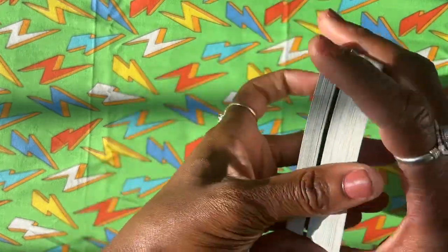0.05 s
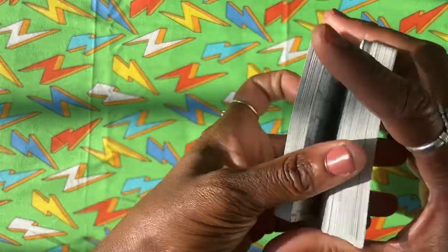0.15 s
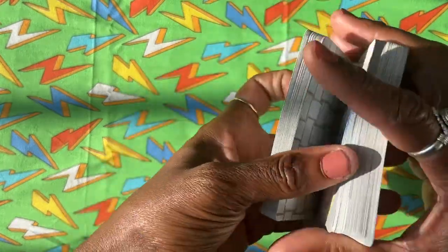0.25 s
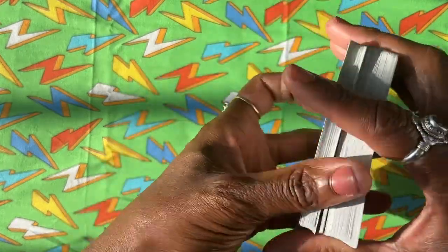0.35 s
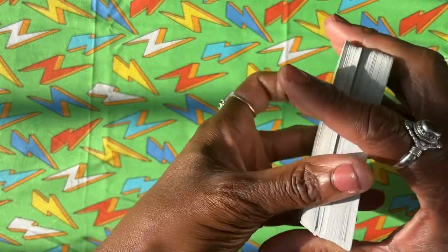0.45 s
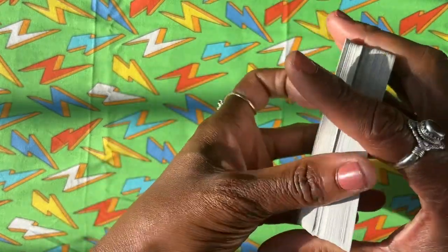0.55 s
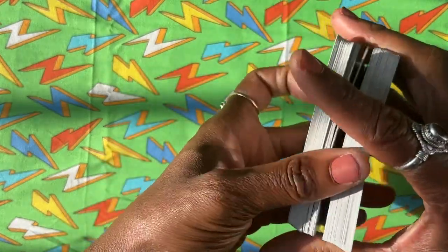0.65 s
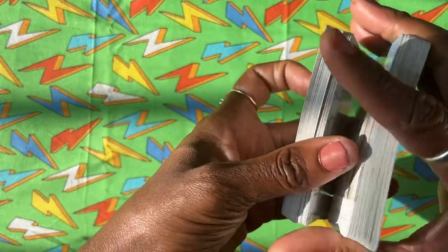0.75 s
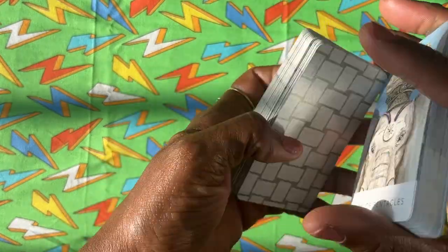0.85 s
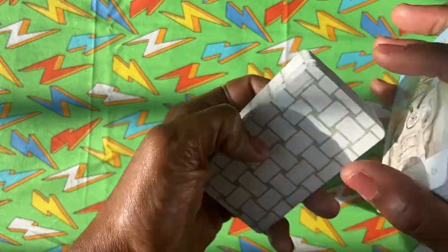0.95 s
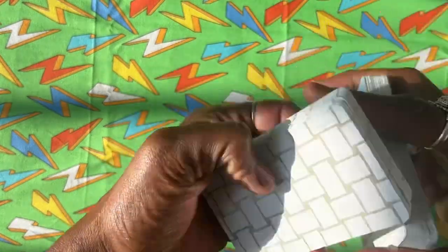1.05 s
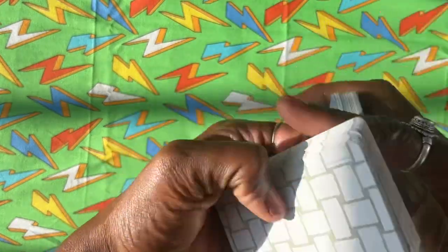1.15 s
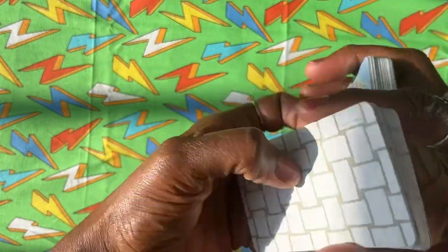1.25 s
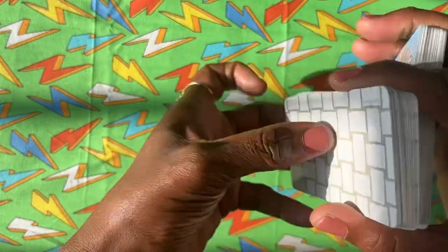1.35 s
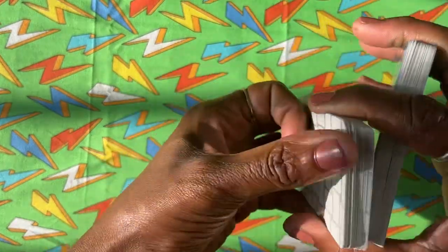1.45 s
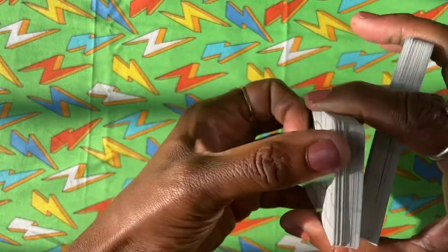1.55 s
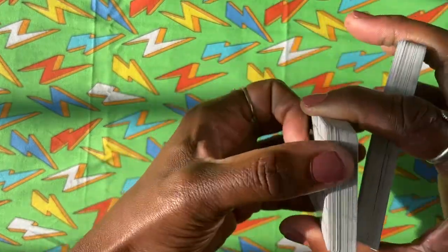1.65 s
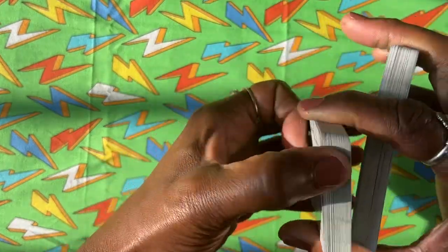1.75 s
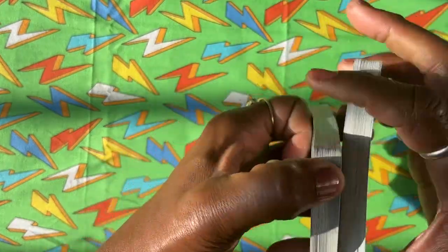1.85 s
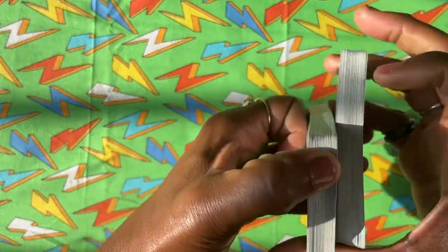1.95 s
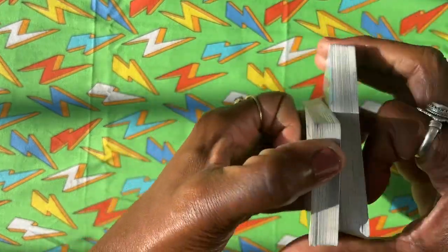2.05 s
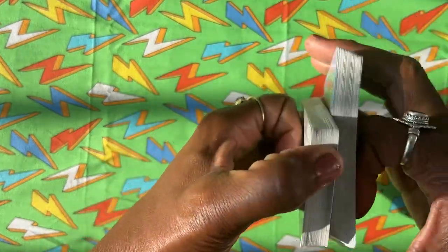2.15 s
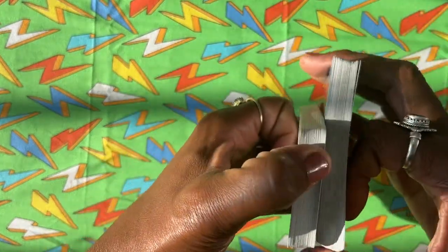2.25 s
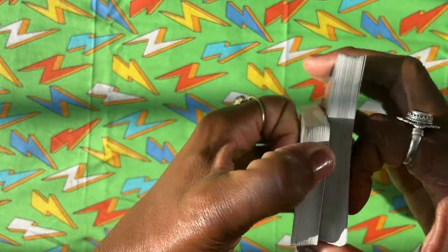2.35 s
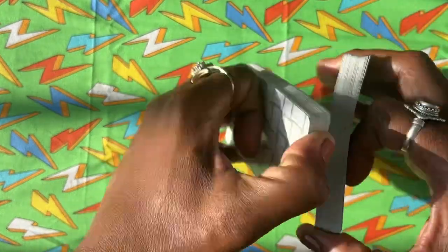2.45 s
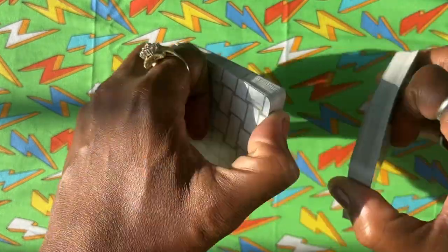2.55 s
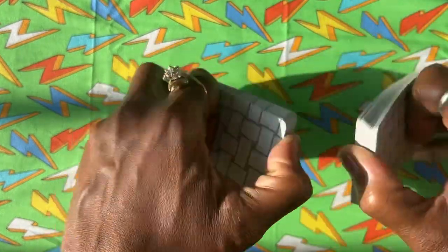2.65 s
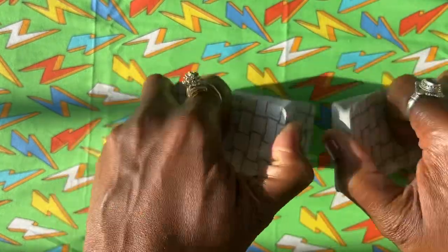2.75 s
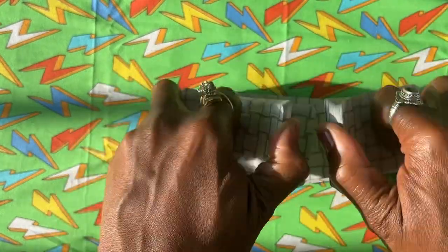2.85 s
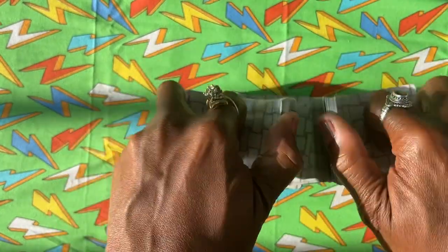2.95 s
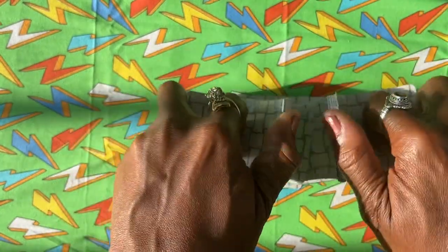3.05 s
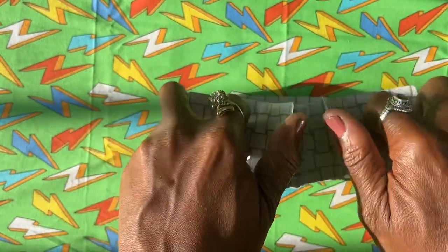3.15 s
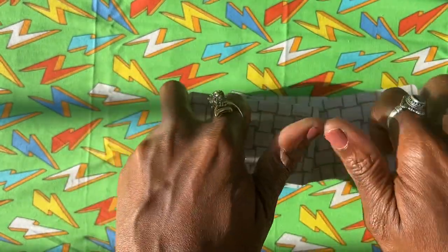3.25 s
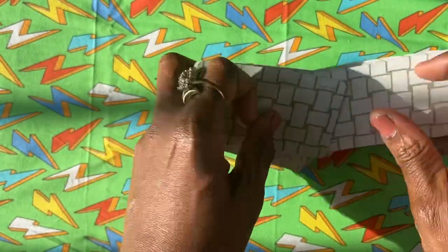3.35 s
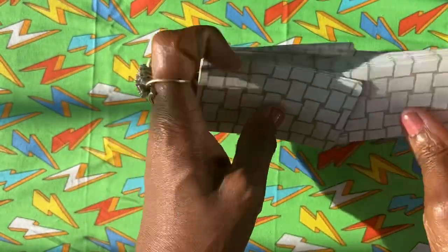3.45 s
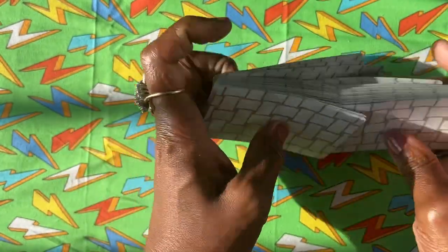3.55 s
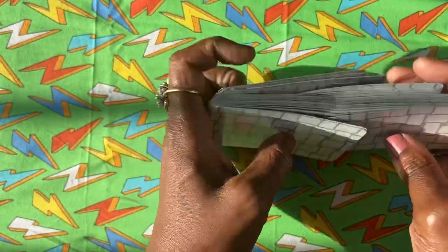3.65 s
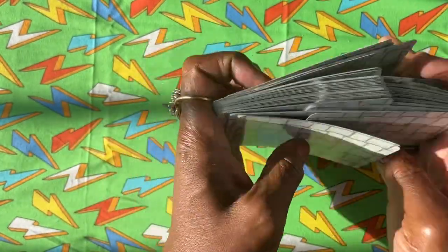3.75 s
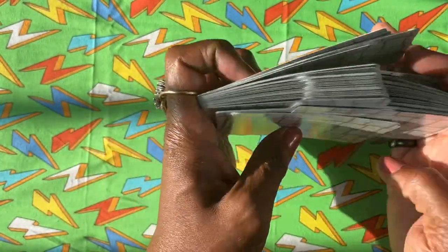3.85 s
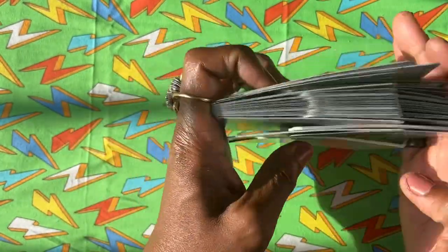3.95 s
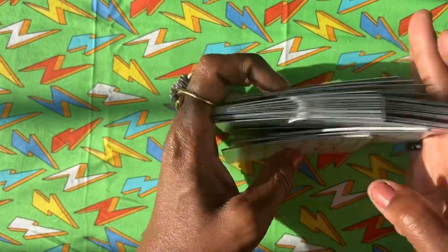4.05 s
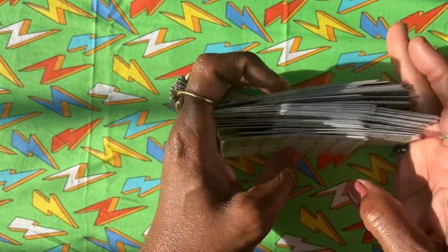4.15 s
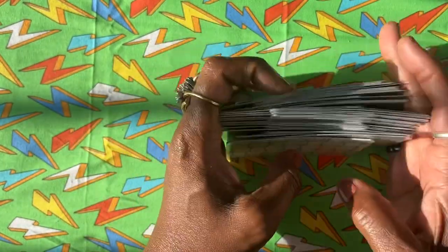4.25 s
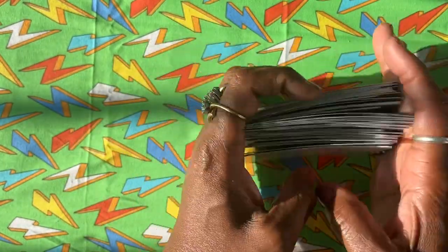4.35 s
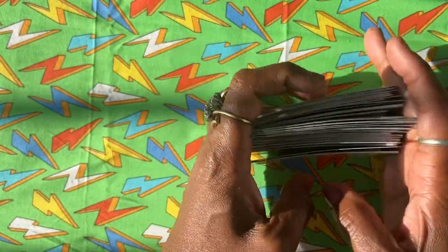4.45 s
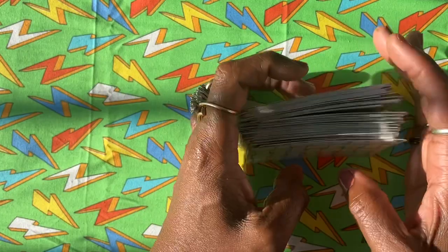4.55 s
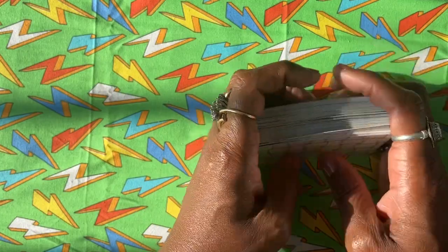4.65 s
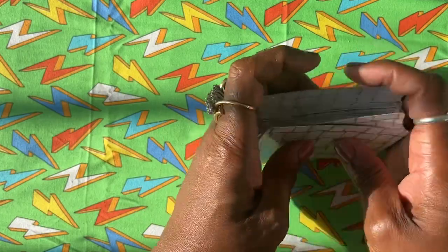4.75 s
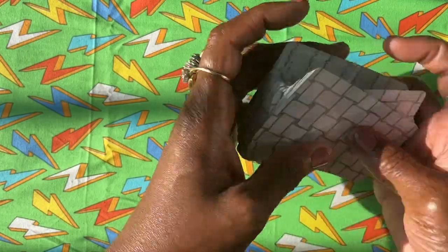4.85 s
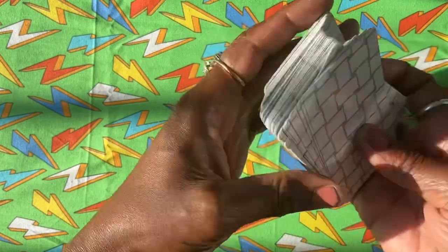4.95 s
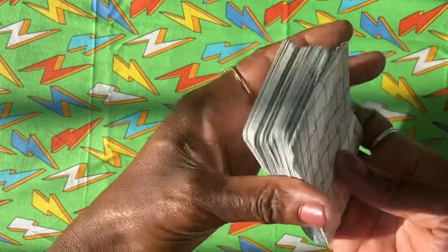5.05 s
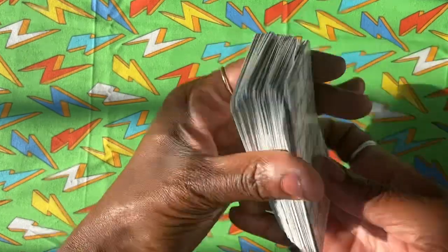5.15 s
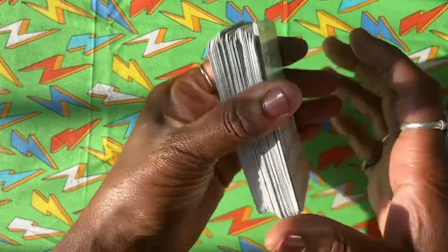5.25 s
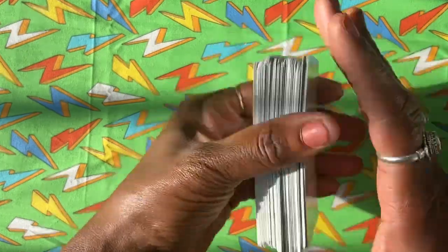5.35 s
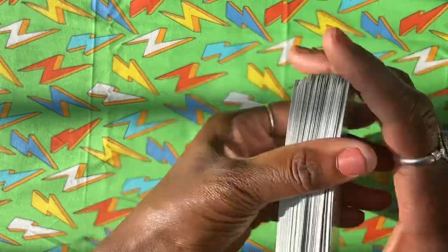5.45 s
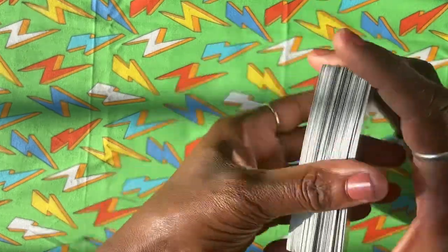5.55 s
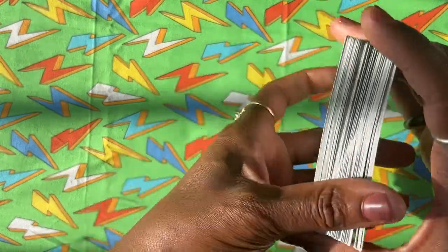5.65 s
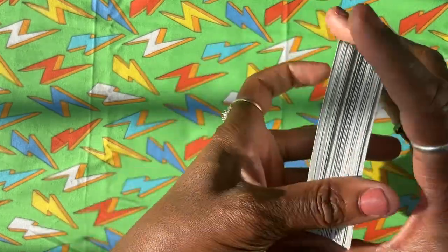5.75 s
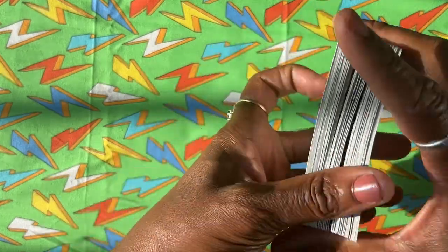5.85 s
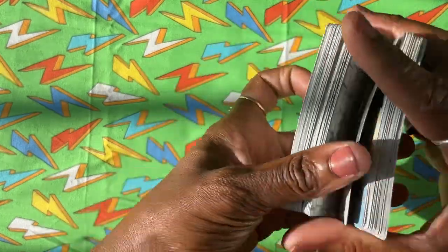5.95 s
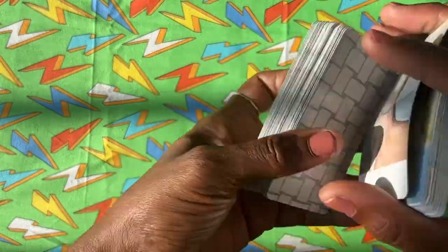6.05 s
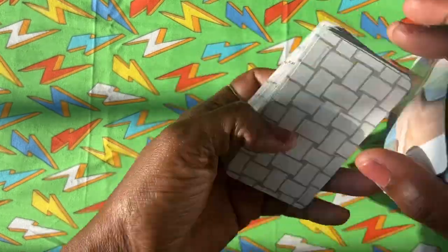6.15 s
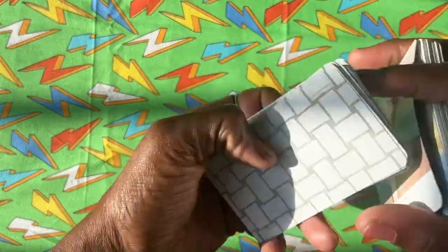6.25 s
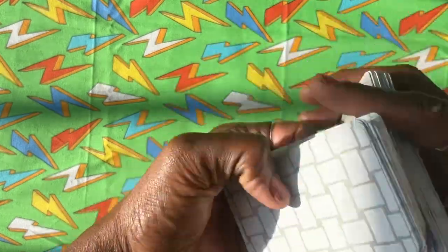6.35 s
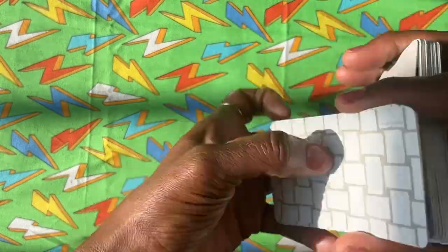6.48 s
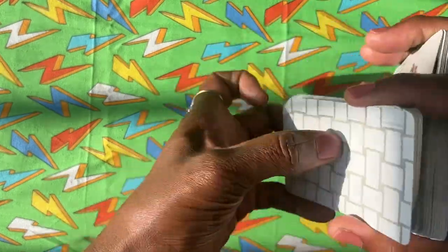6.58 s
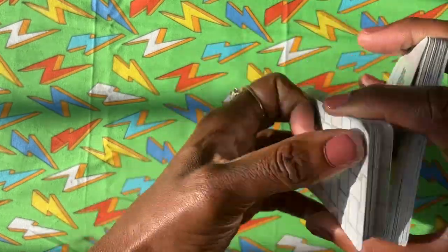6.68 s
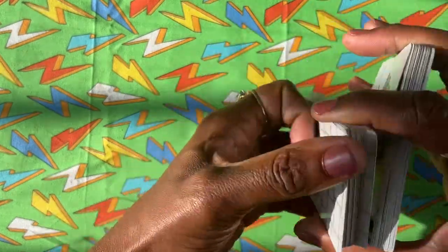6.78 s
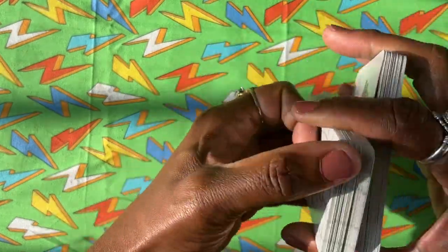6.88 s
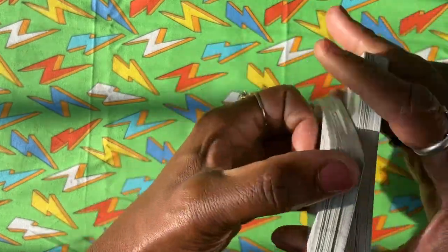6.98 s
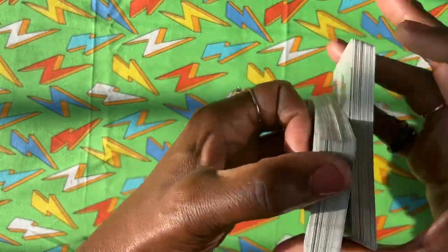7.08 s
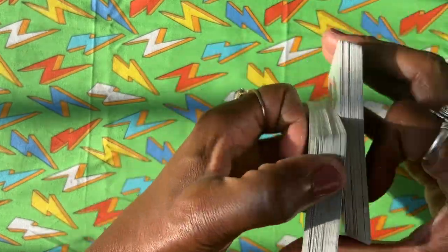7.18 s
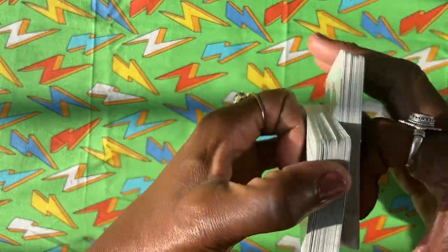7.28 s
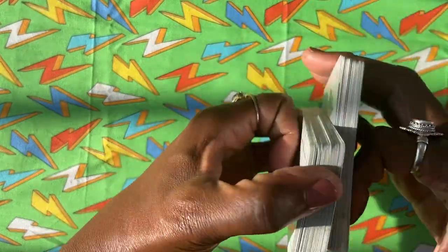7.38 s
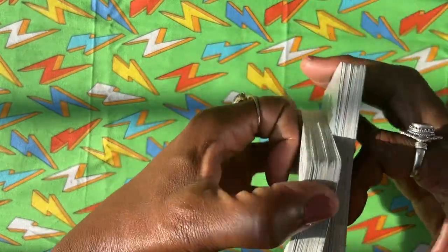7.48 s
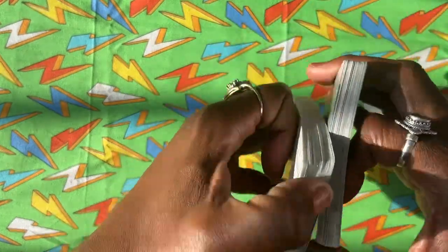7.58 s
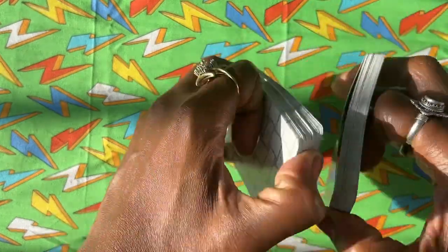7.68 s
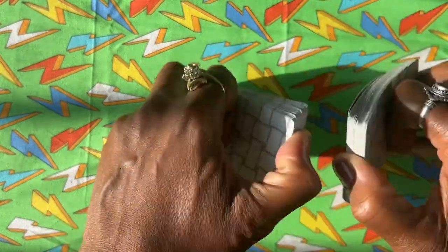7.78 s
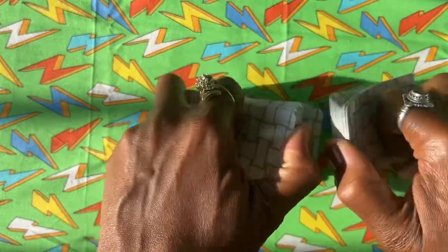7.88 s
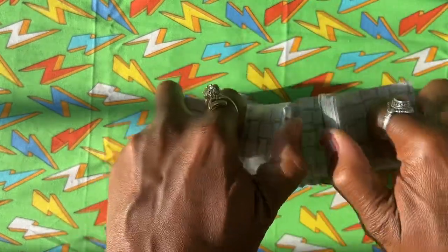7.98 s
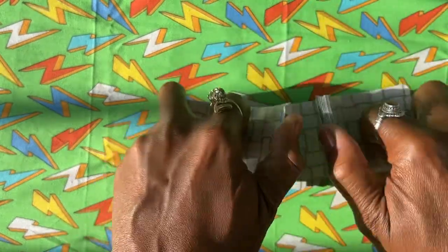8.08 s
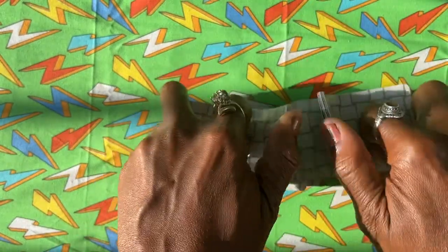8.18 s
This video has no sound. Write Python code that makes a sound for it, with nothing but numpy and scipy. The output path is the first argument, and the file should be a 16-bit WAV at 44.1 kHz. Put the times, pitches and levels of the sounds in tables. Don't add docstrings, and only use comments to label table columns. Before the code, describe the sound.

Quiet card-edge rubbing and ticking, then a loud crackling riffle, soft hollow knocks pushing the deck together, more handling, and a second riffle cut off.

```python
import sys
import numpy as np
from scipy import signal
from scipy.fft import rfft, irfft, next_fast_len
from scipy.io import wavfile
from scipy.ndimage import uniform_filter1d, map_coordinates

SR = 44100
rng = np.random.default_rng(int(sys.argv[2]) if len(sys.argv) > 2 else 0)


def file_out(sig):
    cols = np.atleast_2d(sig).T
    lim = np.clip(cols, -1, 1)
    pcm = np.round(lim * 32767).astype(np.int16)
    wavfile.write(sys.argv[1], SR, pcm)


def magnitude_from_level(level_db):
    exponent = np.asarray(level_db, float) / 20
    return 10 ** exponent


N = 362502
TIME_S = np.arange(N) / SR
FRAME = 4096
LAG_S = (np.arange(FRAME) - FRAME // 2) / SR

# [freq_hz, level_db]
CARD_COLOUR = [(500, -16.5), (1200, 2), (2500, 3), (4000, 2), (6500, -2.5), (8200, -3), (12500, -10.5),
               (15400, -7.5), (17000, -49.5)]


def unit(x):
    return x / np.sqrt(np.mean(x ** 2) + 1e-20)


def along(points, hz):
    f, v = np.transpose(points)
    return np.interp(np.log(hz + 1), np.log(f + 1), v)


def wobble(knots_per_s):
    knots = rng.standard_normal(int(N * knots_per_s / SR) + 4)
    return map_coordinates(knots, [TIME_S * knots_per_s])


def filtered(x, response):
    n = x.shape[-1]
    m = next_fast_len(n + 4096)
    return irfft(rfft(x, m) * response(np.fft.rfftfreq(m, 1 / SR)), m)[..., :n]


def resonance(f, hz, width_hz):
    return 1j * f * width_hz / (hz * hz - f * f + 1j * f * width_hz)


def deck_body(f):
    # [freq_hz, width_hz, level_db]
    air_modes = [(191, 19, -9), (337, 120, -0.5), (528, 150, -3), (725, 143, -0.5), (1060, 400, -10.5),
                 (1450, 290, -8.5)]
    response = 0
    for k, (hz, width_hz, db) in enumerate(air_modes):
        response = response + (-1) ** k * magnitude_from_level(db) * resonance(f, hz, width_hz)
    return response


def spread(pair, alike):
    turn = lambda hz: np.arccos(np.clip(along(alike, hz), -1, 1)) / 2
    mid, side = filtered(pair, lambda hz: np.array([np.cos(turn(hz)), np.sin(turn(hz))]))
    return np.array([mid + side, mid - side])


def add(out, start_s, peak_db, burst):
    peak = np.sqrt(np.abs(uniform_filter1d(burst[0] ** 2, size=66)).max())
    target = out[:, round(start_s * SR):][:, :FRAME]
    target += magnitude_from_level(peak_db) * burst[:, :target.shape[1]] / peak


def blank():
    return np.zeros((2, N + FRAME))


def trimmed(out):
    return out[:, FRAME // 2:][:, :N]


def swell(fall_ms, rise):
    return np.exp(np.where(LAG_S < 0, LAG_S / rise, -LAG_S) * 1000 / fall_ms)


def gestures(rows, attack_db_per_s, release_db_per_s, rest_db):
    out_db = np.full(N, float(rest_db))
    for start_s, hold_s, db in rows:
        before_db = attack_db_per_s * (start_s - TIME_S)
        after_db = release_db_per_s * (TIME_S - start_s - hold_s)
        out_db = np.maximum(out_db, db - np.maximum(before_db, np.maximum(after_db, 0)))
    return out_db


def snaps(rows, shorten, rise, ring_db, ring_width, spiky_db, body_db, upper, lead_in):
    out = blank()
    for start_s, peak_db, hz, ms, deck_db in rows:
        noise = rng.standard_normal((5, FRAME))
        upper_hz = hz * rng.uniform(1.4, 2.6)
        shape = swell(shorten * ms, rise + 0.0012 * ms)
        release = 2.2 * min(1, 10 / ms) * swell(.3, .3)
        drag = lead_in * swell(0.96, 3.2)
        spikes = magnitude_from_level(spiky_db * unit(uniform_filter1d(noise[4], size=12)))
        crackle = noise[:2] * ((shape + drag) * spikes + release)
        tilt = np.clip(.4 - 0.044 * ms + 1.2 * np.log2(hz / 3000), -1.2, 1.3)

        def card(f):
            lower_mode = resonance(f, hz, ring_width * hz)
            upper_mode = upper * resonance(f, upper_hz, ring_width * hz)
            ring = 1 + magnitude_from_level(ring_db) * (lower_mode - upper_mode)
            return magnitude_from_level(along(CARD_COLOUR, f)) * (1 + f / 5000) ** tilt * ring

        add(out, start_s, peak_db, filtered(crackle, card))
        pumped = filtered(noise[2:4] * shape, deck_body)
        add(out, start_s + .001, peak_db + deck_db + body_db, pumped)
    return trimmed(out)


def blows(rows, shorten, rise, sharp, rattle):
    out = blank()
    for start_s, peak_db, hz, ms in rows:
        noise = rng.standard_normal((4, FRAME))
        drift = filtered(noise[:2], lambda f: resonance(f, hz, hz / sharp) ** 2)
        tone = np.sin(2 * np.pi * (hz * LAG_S + rng.random((2, 1)))) + 0.55 * unit(drift)
        tone = tone + rattle * unit(filtered(noise[2:], deck_body))
        rounded = uniform_filter1d(swell(shorten * ms, rise), size=int(SR / hz))
        add(out, start_s, peak_db, tone * rounded * np.hanning(FRAME))
    return trimmed(out)


def room_tone():
    # [freq_hz, density_db_per_hz]
    spectrum = [(28, -6), (50, 1.5), (111, -3), (220, -15.5), (288, -31), (720, -30), (950, -38.5),
                (1300, -27), (1700, -23), (1860, -38), (2500, -38), (3300, -54.5), (9600, -59),
                (16000, -76)]
    # [freq_hz, likeness]
    alike = [(100, .97), (290, .7), (1400, .02), (3000, .5), (12000, .99)]
    # [time_s, level_db]
    drift = [(0, -49.5), (1.3, -51.5), (3.5, -51), (5.6, -52.5), (6.3, -51), (8.22, -52.5)]
    tone = unit(filtered(rng.standard_normal((2, N)), lambda f: magnitude_from_level(along(spectrum, f))))
    return magnitude_from_level(np.interp(TIME_S, *np.transpose(drift))) * spread(tone, alike)


def sliding(clumped):
    # [start_s, hold_s, level_db]
    strokes = [(.1, 0.15, -69.5), (.33, 0.044, -61.5), (.61, 0.079, -69.5), (.84, 0.094, -66),
               (1.1, 0.23, -65.5), (1.42, 0.05, -68.5), (1.62, 0.02, -73.5), (1.76, 0.071, -71.5),
               (2.03, 0.0091, -65), (2.13, 0.023, -69), (2.42, 0.075, -79), (3.66, 0.064, -50.5),
               (4.06, 0.11, -56), (4.31, 0.033, -53.5), (4.52, 0.02, -60), (4.66, 0.053, -59.5),
               (5.0, .29, -66), (5.42, 0.205, -66.5), (5.93, 0.0071, -47.5), (6.09, 0.042, -50),
               (6.28, 0.087, -63), (6.45, 0.073, -58), (6.69, 0.029, -66), (6.82, 0.016, -57.5),
               (6.93, 0.006, -61.5), (7.19, 0.014, -63), (7.56, 0.017, -61), (7.72, 0.115, -69)]
    # [start_s, hold_s, level_db]
    grips = [
        (3.278, 1.46, -66),
        (4.756, 0.17, -72.5),
        (5.9, 1.38, -71.5),
    ]
    # [start_s, hold_s, level_db]
    squeezes = [
        (.05, 1.35, -61.5),
        (3.3, 0.71, -61),
        (4.07, 0.068, -44.5),
        (4.34, 0.0033, -52),
        (4.51, 0.018, -51.5),
        (4.6, 0.1, -45),
        (6.11, 0.0092, -56.5),
        (6.3, 0.2, -57),
        (7.55, 0.011, -57.5),
        (7.75, 0.15, -52),
    ]
    # [time_s, sliding_db]
    thumbs = [
        [(2.55, -88), (2.75, -66), (2.94, -52), (2.98, -31), (3.03, -29.5), (3.08, -22.5), (3.185, -37.5),
         (3.21, -51), (3.4, -83)],
        [(7.8, -97.5), (7.9, -62), (7.98, -50.5), (8.05, -37.5), (8.11, -34.5), (8.17, -32), (8.22, -28.5)],
    ]
    # [sliding_db, air_db]
    flex_law = [(-100, -90), (-68.5, -52), (-58, -39.5), (-30, -23.5)]
    # [freq_hz, level_db]
    light_colour = [(500, -27), (1500, -4), (3300, -2), (6500, -4), (8200, -1.5), (11200, -5.5),
                    (15700, -5), (16400, -42)]

    bends_db = [np.interp(TIME_S, *np.transpose(bend), left=-99) for bend in thumbs]
    thumbs_db = np.maximum(*bends_db)
    rubs_db = gestures(strokes + grips, attack_db_per_s=422, release_db_per_s=376, rest_db=-106)
    hiss_db = np.maximum(thumbs_db, rubs_db)
    flex_db = np.interp(thumbs_db, *np.transpose(flex_law))
    squeezed_db = gestures(squeezes, attack_db_per_s=230, release_db_per_s=169, rest_db=-71.5)
    air_db = np.maximum(flex_db, squeezed_db)
    pressure = np.clip((hiss_db + 46) / 10, 0, 1)

    grain = magnitude_from_level(1.2 * wobble(70) + (2.2 + 3.4 * pressure) * wobble(350))
    z = signal.stft(grain * rng.standard_normal((2, N)), nperseg=256)[2]
    patches = uniform_filter1d(rng.standard_normal(z.shape[1:]), size=5, axis=0)
    patches = uniform_filter1d(patches, size=9, axis=1)
    patchy = signal.istft(z * magnitude_from_level(2.8 * unit(patches)), nperseg=256)[1][:, :N]
    patchy = patchy / magnitude_from_level(2 * pressure)

    light = unit(filtered(patchy, lambda f: magnitude_from_level(along(light_colour, f))))
    firm = unit(filtered(patchy, lambda f: magnitude_from_level(along(CARD_COLOUR, f))))
    firm = unit(filtered(firm, lambda f: (1 + (f / 4000) ** 2) ** -0.2))
    hiss = (1 - pressure) * light + pressure * clumped ** .6 * firm
    rush = unit(filtered(magnitude_from_level(1.1 * wobble(37)) * rng.standard_normal((2, N)), deck_body))
    return magnitude_from_level(hiss_db) * hiss + magnitude_from_level(air_db - 9.5) * clumped ** .55 * rush


def edge_scuffs():
    # [start_s, peak_db, ring_hz, length_ms]
    flicks = [(0.158, -53.5, 2550, 26), (0.6445, -49, 1550, 15.5), (1.124, -51.5, 1670, 67),
              (1.2365, -43.5, 1440, 29), (1.2794, -52.5, 1570, 25), (2.015, -50, 1360, 29),
              (2.1148, -53, 1750, 14), (3.3682, -50, 3600, 2.5), (3.413, -43.5, 1310, 26),
              (3.5418, -54, 2310, 9.2), (3.9398, -44.5, 6420, 14.5), (5.1873, -59.5, 1120, 7.4),
              (5.4909, -53, 1633, 27), (5.9346, -47.5, 3520, 20), (6.262, -44.5, 2680, 6.4),
              (6.2724, -40, 2460, 37), (6.393, -47.5, 1730, 18), (6.4596, -43, 1500, 30),
              (6.5201, -45.5, 1690, 29), (6.5347, -54.5, 1715, 17), (7.129, -47.5, 3240, 10.8),
              (7.18, -49, 1624, 19)]
    # [start_s, peak_db, ring_hz, length_ms]
    more_flicks = [(.34, -56, 3260, 15), (.885, -61, 2600, 10), (.93, -61, 2380, 11), (1.073, -69, 2600, 11),
                   (1.093, -60, 2600, 11), (1.121, -54, 3200, 11), (1.139, -56, 1820, 14),
                   (1.257, -56, 1480, 7.7), (1.271, -49.5, 2120, 32), (1.319, -59, 2020, 14),
                   (1.321, -66, 4000, 12), (3.41, -49, 2780, 40), (3.547, -53, 1900, 8),
                   (3.649, -50.5, 2200, 5), (3.696, -48, 3460, 89), (3.804, -50.5, 3500, 16),
                   (4.999, -70, 3250, 30), (5.037, -61, 3580, 58), (5.068, -54.5, 3530, 20),
                   (5.134, -58.5, 1246, 14), (5.172, -56.5, 990, 28), (5.182, -56, 1400, 20),
                   (5.195, -55, 1520, 10), (5.238, -59.5, 3330, 18), (5.27, -62.5, 5180, 11),
                   (5.454, -62, 3440, 18.4), (5.503, -54, 2370, 21), (6.057, -54.5, 3100, 14),
                   (6.237, -57.5, 3310, 6), (6.286, -43, 3300, 10), (6.337, -52.5, 1690, 11),
                   (6.478, -54, 4500, 31), (6.546, -55.5, 4390, 6.5), (6.943, -65, 2930, 10),
                   (7.006, -53.5, 1300, 14), (7.166, -60, 1500, 8), (7.197, -54, 1860, 14),
                   (7.216, -60, 1700, 10), (7.236, -57, 1850, 9.7), (7.734, -62, 2960, 9.1),
                   (7.849, -63, 3120, 8.5), (7.872, -66, 4140, 8.9), (7.896, -57.5, 3770, 9.7),
                   (7.913, -52.5, 3060, 9.8)]
    deck_db = -19.5
    return snaps([(*row, deck_db) for row in flicks + more_flicks], shorten=0.33, rise=.33, ring_db=15.0,
                 ring_width=0.072, spiky_db=3.5, body_db=-1.0, upper=0.5, lead_in=0)


def face_taps():
    # [start_s, peak_db, ring_hz, length_ms]
    contacts = [(0.173, -56.5, 2440, 150), (0.3077, -53.5, 1450, 80), (0.3646, -52.5, 1370, 39),
                (0.859, -52.5, 2380, 35), (1.212, -54, 1430, 10), (2.1336, -57, 1610, 190),
                (3.431, -35.5, 3250, 5.9), (3.797, -43.5, 5170, 8.5), (3.8149, -41.5, 790, 12),
                (3.9242, -49.5, 5570, 5.7), (4.069, -49, 1400, 41), (4.3446, -43.5, 1610, 23),
                (4.012, -55, 1950, 4.2), (4.121, -56, 1860, 5.2), (4.606, -42.5, 1584, 10.4),
                (4.628, -53, 1600, 8), (4.6661, -49.5, 1450, 134), (5.0055, -52.5, 1065, 36),
                (5.08, -48.5, 2283, 14.6), (6.069, -50, 8100, 3.2), (6.114, -41.5, 4660, 36),
                (6.4346, -43, 1990, 7.3), (6.9105, -51.5, 2090, 25), (7.25, -53.5, 2090, 36),
                (7.5549, -41, 2226, 20.4), (7.553, -39.5, 8800, 5.3)]
    deck_db = -4
    return snaps([(*row, deck_db) for row in contacts], shorten=0.3, rise=.25, ring_db=8.5,
                 ring_width=0.2, spiky_db=5.5, body_db=-1, upper=0.25, lead_in=0)


def riffle_snaps():
    # [start_s, peak_db, ring_hz, length_ms]
    first_riffle = [(2.7498, -50, 2235, 5.6), (2.7805, -43.5, 1320, 23), (2.795, -40.5, 6240, 6.5),
                    (2.822, -30, 7150, 4.1), (2.8384, -27.5, 1659, 16), (2.8632, -30, 1358, 18),
                    (2.864, -25.5, 7390, 4.5), (2.8913, -18, 4400, 3.8), (2.8918, -15.5, 2927, 4.6),
                    (2.9118, -30, 2754, 8.7), (2.9299, -27, 1700, 4), (2.9584, -14, 3803, 5.7),
                    (2.9628, -14, 2782, 2.8), (2.9772, -14, 7490, 1.2), (2.987, -21.5, 3980, 3.3),
                    (2.9925, -23.5, 2922, 7), (3.0005, -18, 4270, 3.9), (3.0128, -29.5, 3864, 4.1),
                    (3.026, -18.5, 1450, 3), (3.029, -18.5, 6804, 4.6), (3.0416, -17.5, 4380, 4.3),
                    (3.0634, -14.5, 2797, 2.8), (3.0702, -13, 4040, 8.4), (3.0762, -18.5, 3660, 2.9),
                    (3.0843, -21, 3860, 2.9), (3.091, -16.5, 2638, 4), (3.096, -23.5, 7960, 3),
                    (3.104, -23.5, 7500, 6.1), (3.1104, -19, 2620, 4.3), (3.1204, -14.5, 4330, 8.7),
                    (3.1241, -20.5, 7820, 5), (3.138, -24, 2188, 4), (3.1465, -11.5, 2215, 2.5),
                    (3.1527, -18.5, 9230, 2.2), (3.153, -15.5, 2708, 8.3), (3.1664, -27.5, 1288, 13),
                    (3.1755, -29.5, 8040, 4), (3.1784, -20, 2300, 5), (3.1828, -16.5, 2800, 5.6),
                    (3.1864, -12, 4700, 4.5)]
    # [start_s, peak_db, ring_hz, length_ms]
    second_riffle = [(7.9437, -39, 4200, 2.6), (7.945, -37.5, 1400, 5), (7.9635, -32.5, 8000, 4.3),
                     (7.9633, -21, 1820, 8.9), (7.9799, -45, 1390, 6), (7.988, -20.5, 2950, 7.7),
                     (7.997, -37.5, 7000, 3), (8.012, -34, 2960, 20), (8.024, -26.5, 5150, 8.1),
                     (8.0291, -22.5, 2510, 5.2), (8.0335, -15.5, 2890, 6.2), (8.045, -38, 1600, 7),
                     (8.0547, -25, 3800, 10), (8.0608, -22.5, 1770, 3), (8.0665, -18, 7800, 2.9),
                     (8.0669, -16, 1330, 7.3), (8.079, -22, 7740, 2.3), (8.0797, -21, 1290, 11),
                     (8.0995, -23, 1490, 8), (8.1155, -21.5, 2830, 6.4), (8.1299, -20.5, 3350, 6.4),
                     (8.138, -19, 4130, 2), (8.1533, -17.5, 7940, 4.2), (8.155, -11, 3110, 4.5),
                     (8.163, -19.5, 4064, 3), (8.1723, -11, 3860, 7.6), (8.184, -25, 2040, 11),
                     (8.194, -14, 4102, 10), (8.213, -34, 4138, 5), (8.2192, -14.5, 2680, 6.5)]
    full_pump_db, pump_lag_db_per_db = -31.5, 0.49
    flips = []
    for row in first_riffle + second_riffle:
        flips.append((*row, -pump_lag_db_per_db * max(row[1] - full_pump_db, 0)))
    return snaps(flips, shorten=0.61, rise=0.14, ring_db=8.5, ring_width=.1, spiky_db=3.5,
                 body_db=-5.5, upper=.6, lead_in=.1)


def clumps(riffle):
    force = np.abs(riffle[0])
    near = np.abs(uniform_filter1d(force, size=SR // 150)) + 1e-4
    around = np.abs(uniform_filter1d(force, size=SR // 12)) + 1e-4
    return near / around


def palm_knocks():
    # [start_s, peak_db, pitch_hz, length_ms]
    pushes = [(2.775, -38, 242, 20), (3.4349, -48.5, 230, 6.6), (3.8163, -40.5, 395, 22),
              (4.0155, -34, 349, 14.4), (4.06, -33, 300, 18), (4.0877, -29, 323, 15),
              (4.1212, -37, 640, 29), (4.1586, -34.5, 337, 31), (4.1946, -40, 381, 29),
              (4.4644, -46.5, 330, 16), (4.518, -40.5, 388, 24), (4.53, -33, 256, 19),
              (4.543, -30.5, 352, 110), (4.608, -45, 447, 6.9), (4.6936, -53.5, 319, 94),
              (5.19, -51, 996, 16.2), (6.1242, -48, 475, 25), (6.2806, -50.5, 516, 29),
              (6.438, -52.5, 365, 13.4), (7.5573, -45.5, 667, 20), (7.8732, -59, 510.0, 35)]
    return blows(pushes, shorten=0.38, rise=0.36, sharp=2.0, rattle=0.13)


def air_pops():
    # [start_s, peak_db, pitch_hz, length_ms]
    first_pops = [(2.7831, -38.5, 349.8, 14.6), (2.8229, -34.5, 590.0, 4.5), (2.8397, -34.7, 712, 9.7),
                  (2.8649, -31.5, 530, 17.9), (2.8951, -33, 366.4, 14), (2.9128, -26.5, 645, 11),
                  (2.9311, -28.5, 753, 12), (2.95, -32, 680.0, 2.6), (2.964, -22, 687, 6.9),
                  (2.9957, -19.5, 696, 11), (3.0034, -34, 480.3, 2.4), (3.015, -34.5, 447, 2.7),
                  (3.0272, -21.5, 764, 9.1), (3.0475, -20.5, 463.4, 6.8), (3.067, -18.5, 694, 11),
                  (3.0829, -24, 505, 2.2), (3.092, -17.5, 646, 4.1), (3.1024, -21, 661.3, 5.1),
                  (3.112, -16.5, 671.4, 10.6), (3.1263, -25.5, 516, 7.7), (3.1484, -20.5, 489, 6.1),
                  (3.1588, -24, 690.0, 12), (3.168, -22.5, 452.7, 8.4), (3.1809, -29, 650.0, 3.3),
                  (3.1888, -23.5, 700, 9.2)]
    # [start_s, peak_db, pitch_hz, length_ms]
    second_pops = [(7.9347, -38, 330.0, 18.1), (7.9641, -28, 880, 7.1), (7.9795, -32.5, 472.3, 5.7),
                   (7.99, -31.5, 940, 9.4), (7.998, -30, 490.0, 8.8), (8.0124, -28.5, 725, 5.2),
                   (8.0334, -28, 825, 7), (8.045, -28.5, 467, 12), (8.0576, -23, 494, 4.5),
                   (8.0684, -23, 650.0, 51.6), (8.083, -30.5, 750, 8.9), (8.1013, -28, 560.0, 8),
                   (8.1087, -25.5, 620.0, 2.9), (8.1175, -22.5, 608, 5.6), (8.133, -18, 539, 1.4),
                   (8.139, -23, 360.5, 15.5), (8.1566, -27.5, 650.0, 2.5), (8.1644, -22.5, 535, 30.4),
                   (8.1721, -21, 718, 5.7), (8.187, -27, 744, 5.8), (8.1969, -21, 720, 8.3)]
    longest_ms = 12
    rows = [(*row[:3], min(row[3], longest_ms)) for row in first_pops + second_pops]
    return blows(rows, shorten=0.37, rise=0.7, sharp=1.2, rattle=0.41)


def table_thuds():
    # [start_s, peak_db, pitch_hz, length_ms]
    thuds = [(2.8093, -36, 114, 55), (2.859, -34, 91, 33), (2.88, -32, 45.3, 64), (2.9161, -33.5, 115, 24),
             (2.941, -34.5, 122, 20), (2.9723, -32.5, 96, 21), (3.005, -39, 101, 42),
             (3.0358, -31.5, 94, 45), (3.097, -33.5, 156, 35), (3.1, -28.5, 45.6, 120),
             (3.1326, -26, 81.4, 30), (3.201, -19, 99, 31), (3.2373, -39.5, 129, 13),
             (3.2602, -35, 115, 17), (4.0274, -40.5, 93.2, 23), (4.0753, -34, 115.5, 15),
             (4.108, -27.5, 129, 47.8), (4.1755, -30, 108, 49), (4.5434, -36.5, 137.3, 83),
             (4.5731, -37.5, 118.6, 26), (6.5297, -39, 103, 68.6), (7.9365, -35.5, 127.3, 14),
             (7.9892, -34.5, 112, 40), (8.0117, -34, 108, 14), (8.0799, -29, 95.6, 43),
             (8.1221, -29.5, 103, 48.3), (8.1905, -29.5, 122, 34), (8.2, -28, 44.6, 90)]
    return blows(thuds, shorten=0.73, rise=0.95, sharp=1.5, rattle=0.013)


def thumbnail_ticks():
    # [start_s, peak_db]
    clicks = [
        (2.9775, -17),
        (3.001, -19.5),
        (3.0286, -18),
        (3.041, -19.5),
        (3.1528, -13),
        (8.1278, -31),
    ]
    out = blank()
    for start_s, peak_db in clicks:
        burst = rng.standard_normal((2, FRAME)) * swell(.45, .7)
        add(out, start_s, peak_db, filtered(burst, lambda f: resonance(f, 14000, 6500) ** 2))
    return trimmed(out)


def walls(x):
    # [freq_hz, t60_s]
    decay = [(200, 0.16), (2000, 0.6), (5000, 0.21), (11000, 0.21)]
    hz, t, z = signal.stft(rng.standard_normal((3, 2, SR // 3)), SR, nperseg=256)
    tails = signal.istft(z * magnitude_from_level(-60 * t / along(decay, hz)[:, None]), SR, nperseg=256)[1]
    x = np.pad(x, ((0, 0), (300, 0)))
    turn = np.arange(x.shape[1]) / SR * 20
    echo = 0
    for k, tail in enumerate(tails):
        spot = (1 + np.cos(2 * np.pi * (turn + k / 3))) / 3
        echo = echo + signal.fftconvolve(x * spot, tail / np.linalg.norm(tail[0]), axes=1)[:, :N]
    return echo * np.sqrt(2)


def scene():
    # [freq_hz, likeness]
    card_alike = [(100, .98), (140, .8), (240, .97), (600, .92), (1400, .7), (3100, .94), (6500, .85),
                  (12000, .99)]
    # [freq_hz, left_over_right_db]
    deck_side = [(60, 0), (330, -.5), (600, -5.5), (1400, 1.5), (3000, 1.05)]
    riffle = riffle_snaps()
    near = riffle + air_pops() + edge_scuffs() + face_taps()
    near = near + palm_knocks() + table_thuds() + thumbnail_ticks()
    scattered = [(hz, alike - 0.12 * (hz > 5000)) for hz, alike in card_alike]
    hands = spread(near + magnitude_from_level(-21) * walls(near), scattered)
    hands = hands + spread(sliding(clumps(riffle)), card_alike)
    sided = filtered(hands, lambda hz: magnitude_from_level(np.outer([.5, -.5], along(deck_side, hz))))
    return sided + room_tone()


def roll_off(x):
    return signal.sosfilt(signal.butter(12, 17000, fs=SR, output="sos"), x)


def record(dry):
    # [freq_hz, lead_rad]
    port_lead = [(0, 0), (5200, -.3), (6200, -2.1), (7000, -4.3), (8300, -6.1), (10200, -6.9),
                 (12100, -9.1), (13600, -9.8), (15200, -12.3), (16500, -12.6)]
    f, lead_rad = np.transpose(port_lead)
    capsule = filtered(dry, lambda hz: 1 / (1 + (34 / (hz + 1)) ** 4))
    phase = lambda hz: np.exp(.5j * np.outer([1, -1], np.interp(hz, f, lead_rad)))
    ports = filtered(capsule, phase) * magnitude_from_level([[-.3], [.3]])
    bent = ports / (1 + np.abs(ports / .85) ** 4) ** (1 / 4)
    return roll_off(bent)


dry = scene()
out = record(dry)
file_out(out)
```